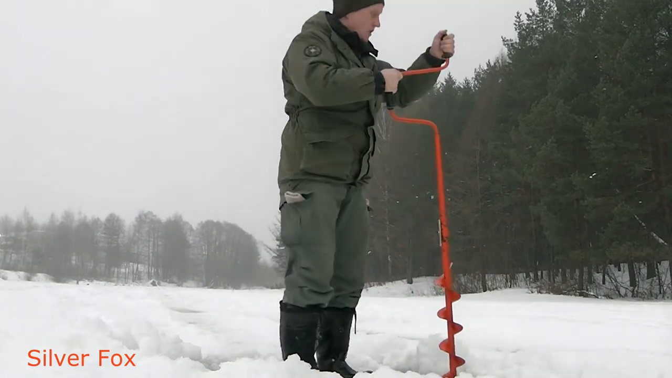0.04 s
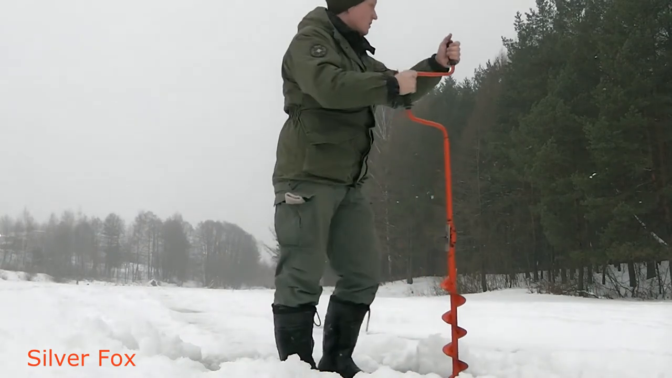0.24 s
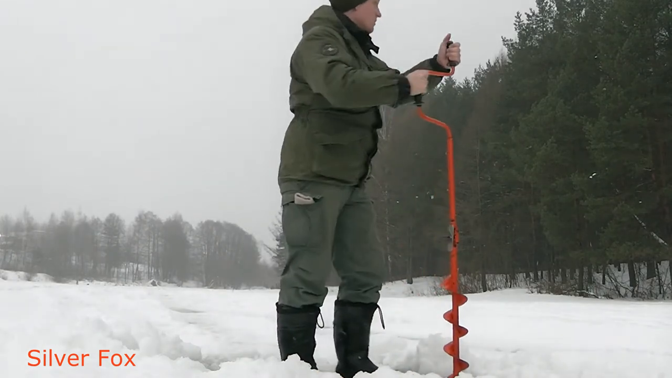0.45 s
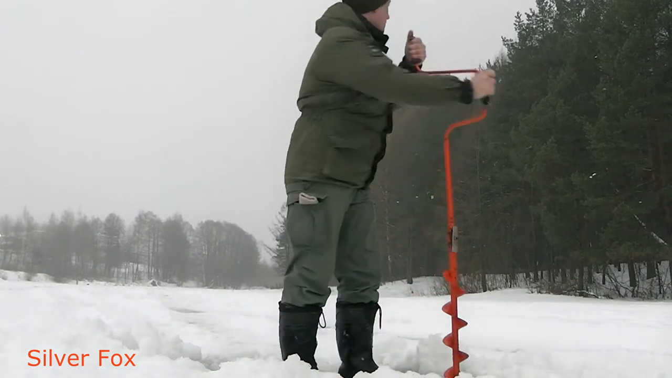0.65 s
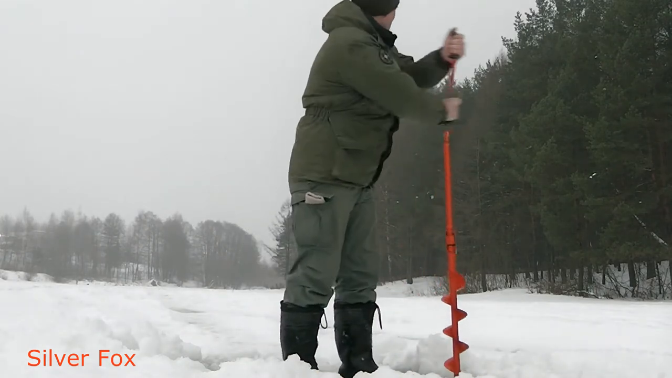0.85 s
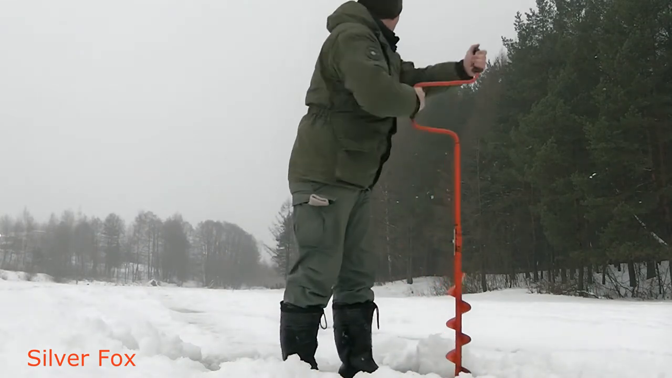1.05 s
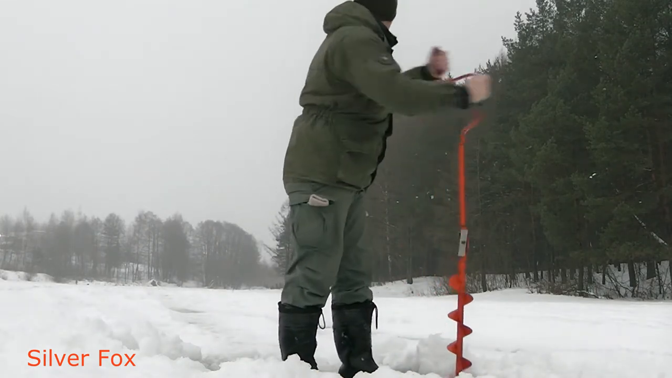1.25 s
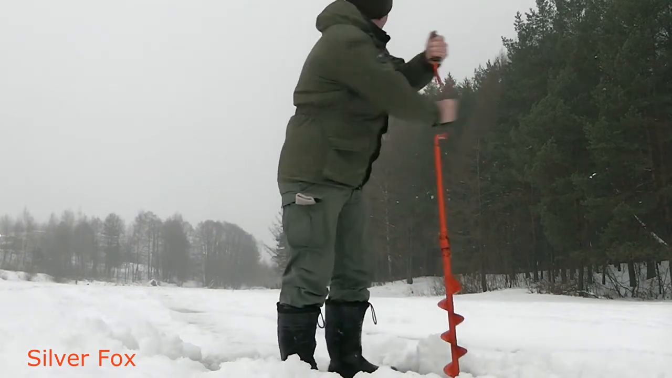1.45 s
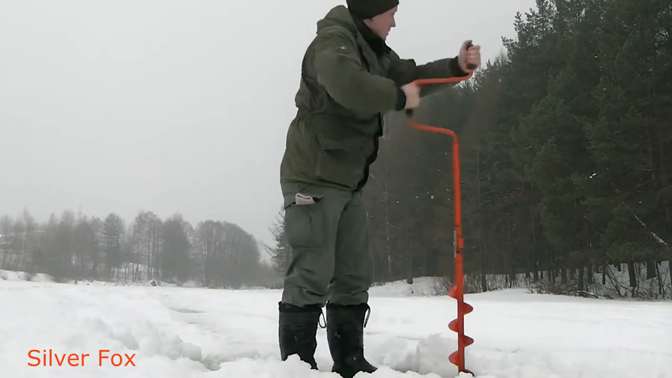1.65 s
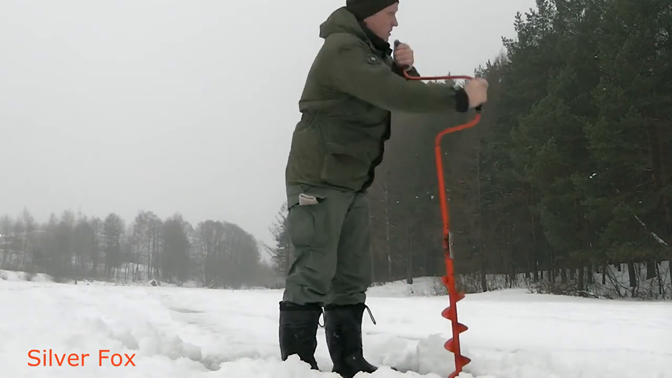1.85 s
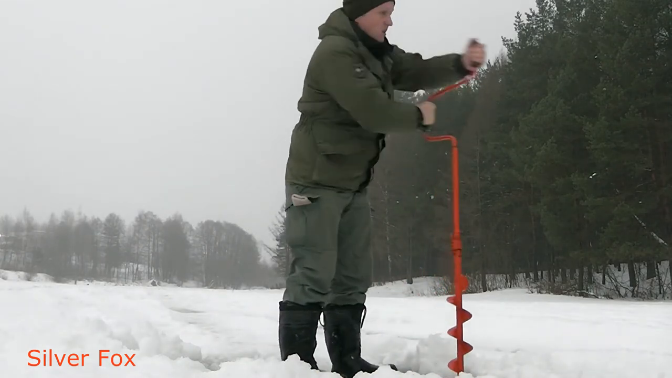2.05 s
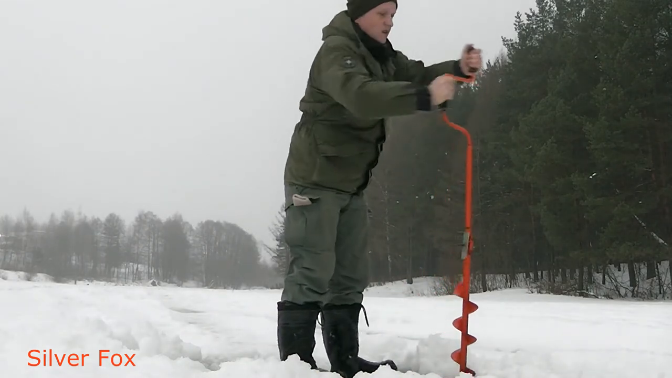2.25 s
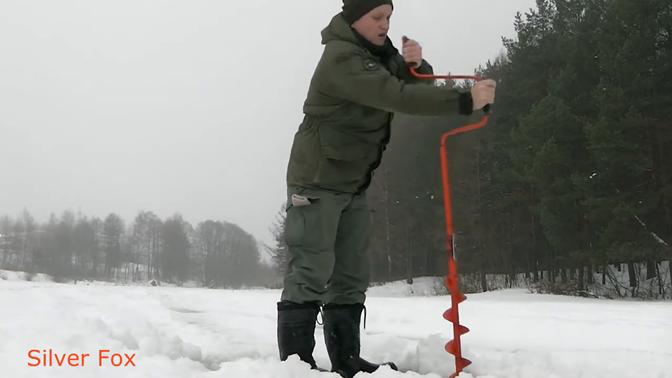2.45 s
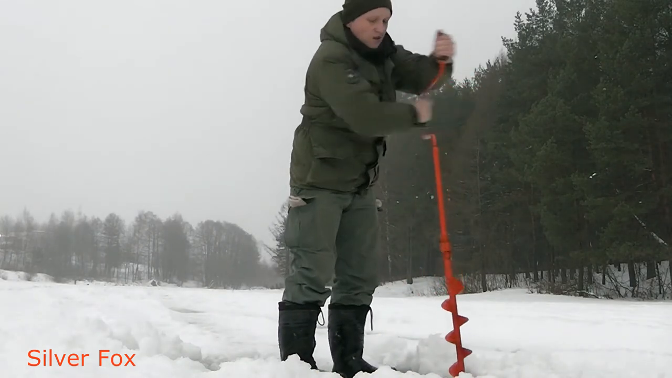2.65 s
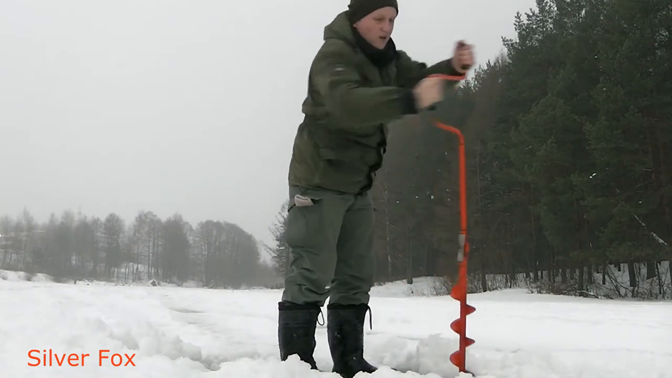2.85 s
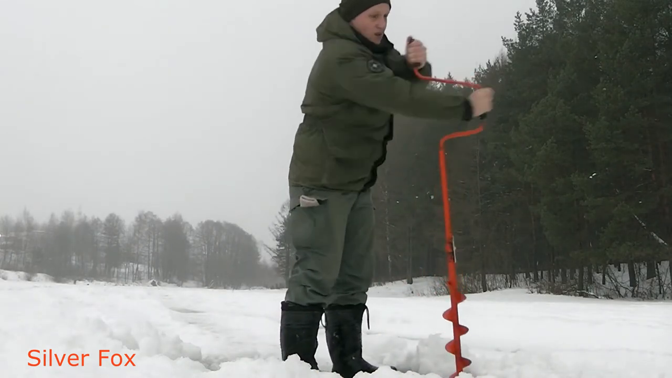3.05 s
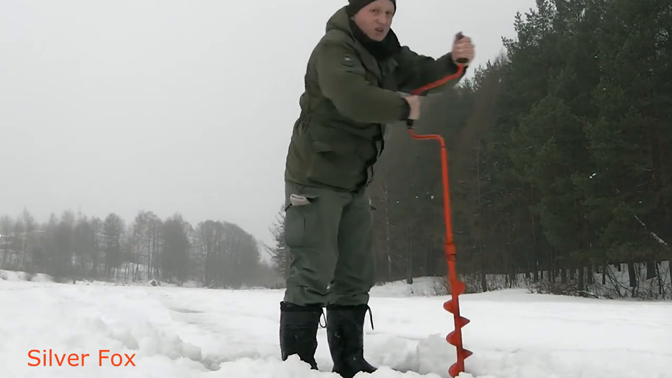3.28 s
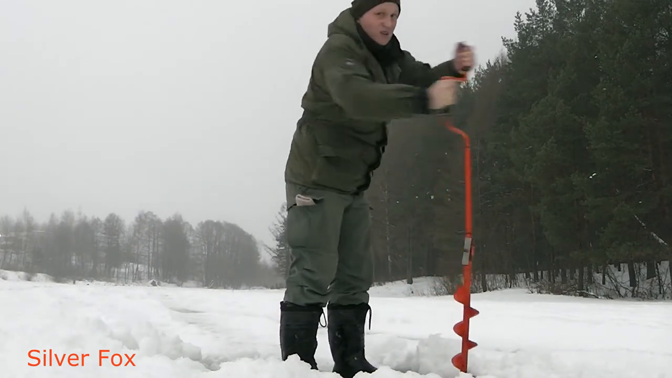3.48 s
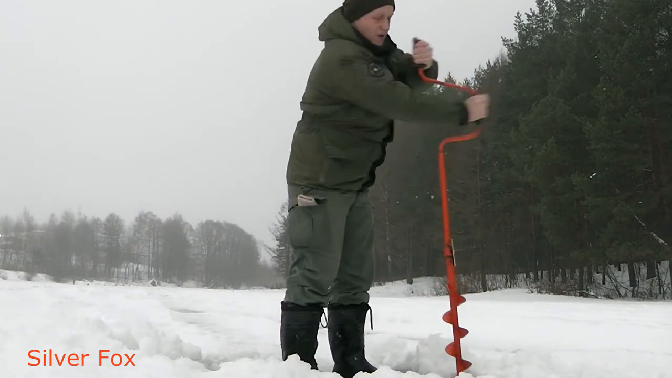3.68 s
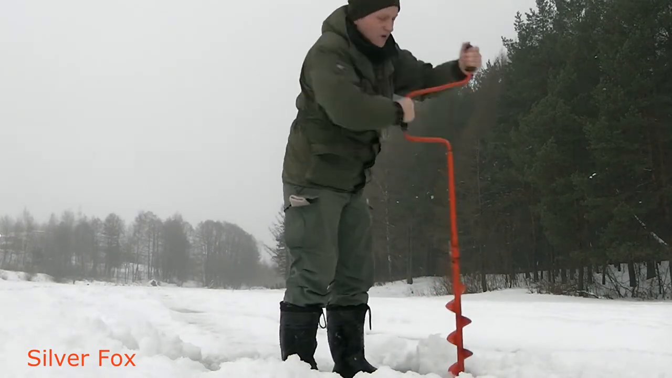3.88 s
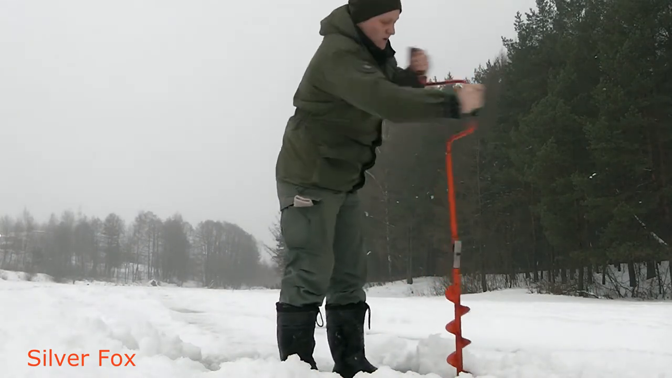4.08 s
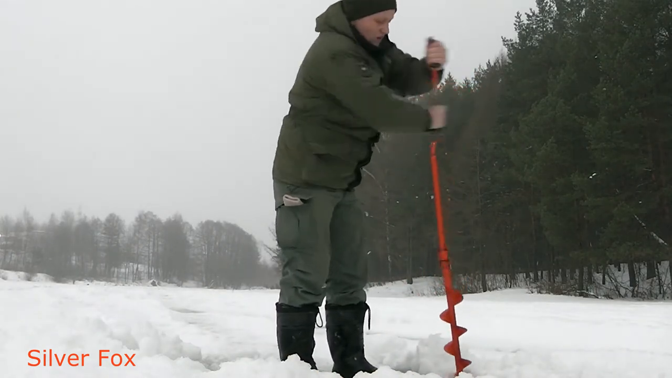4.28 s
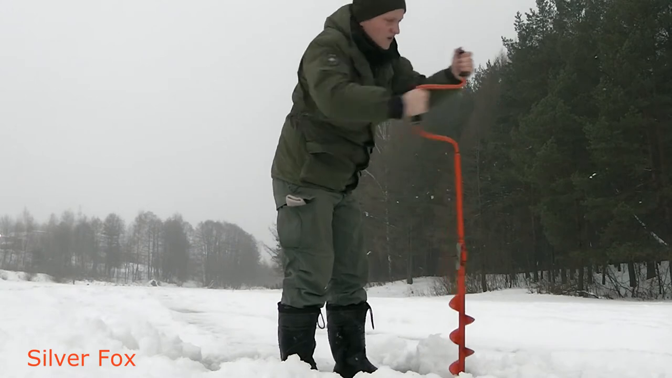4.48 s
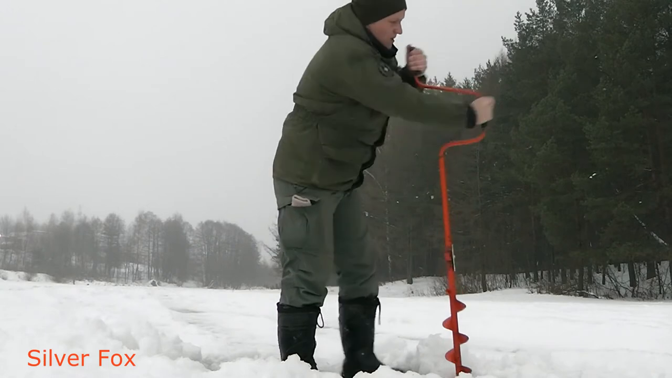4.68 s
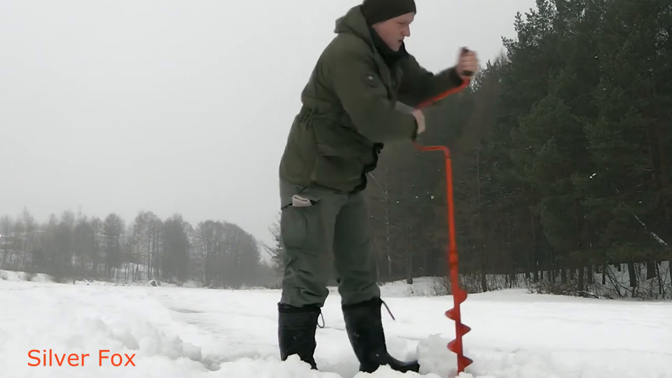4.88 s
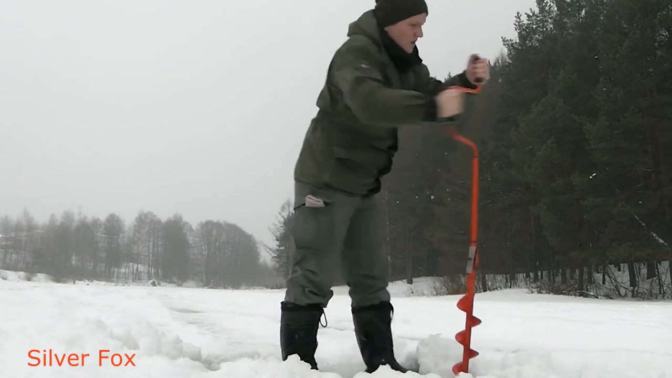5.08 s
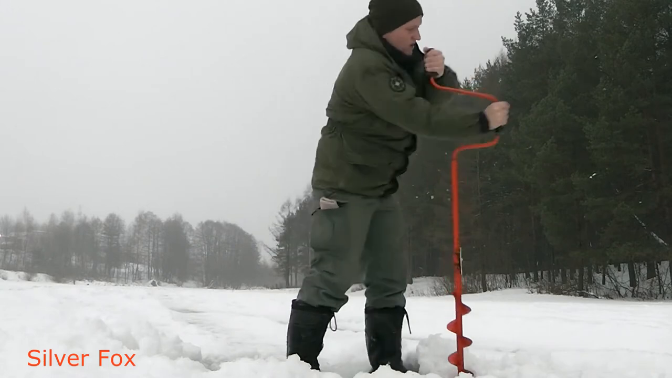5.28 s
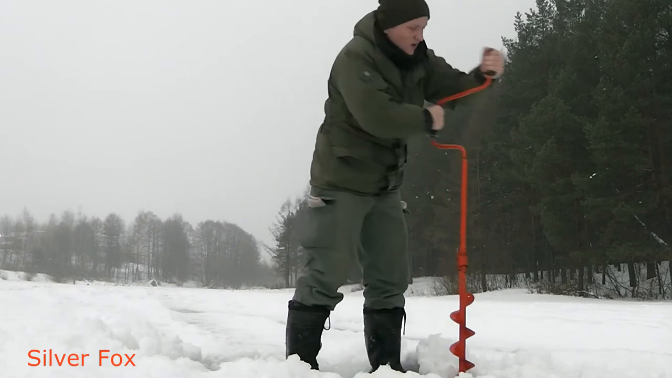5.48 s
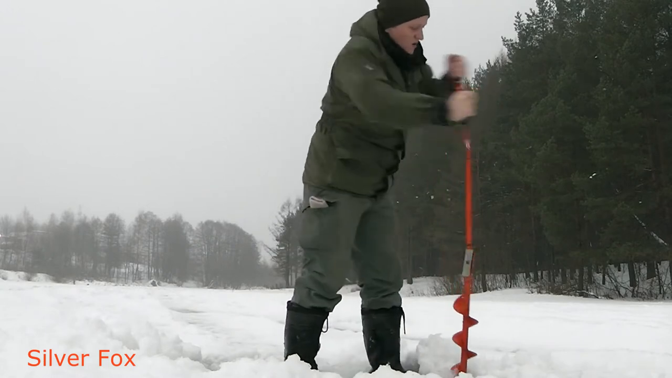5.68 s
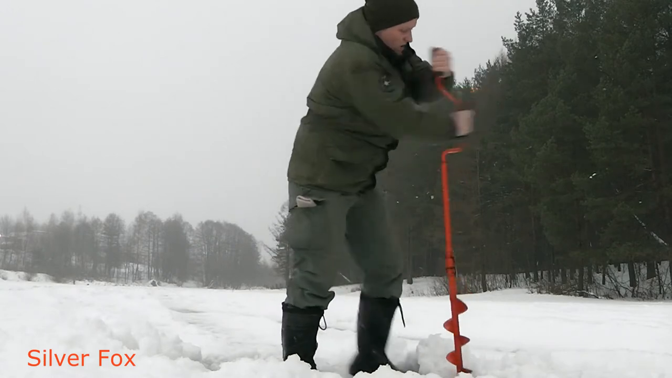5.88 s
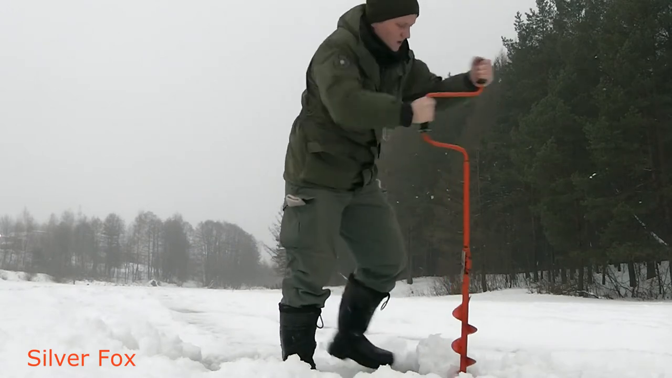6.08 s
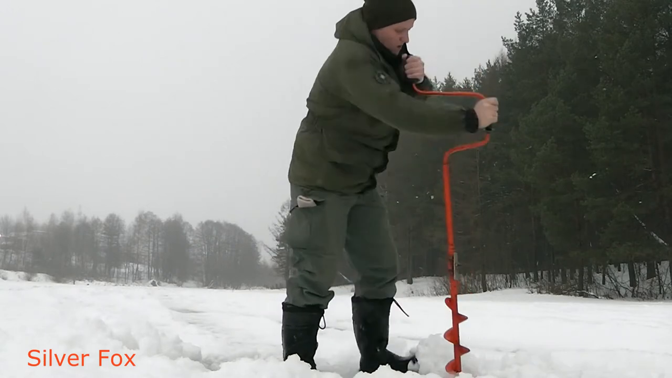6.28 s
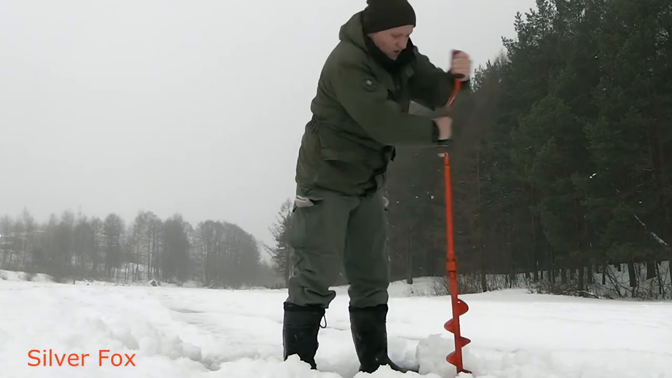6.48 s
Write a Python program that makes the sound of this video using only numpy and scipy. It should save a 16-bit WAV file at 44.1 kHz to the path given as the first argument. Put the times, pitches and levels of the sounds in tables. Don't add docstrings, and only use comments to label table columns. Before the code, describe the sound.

Outdoors in light low wind, a few crisp snow crunches lead into a hand auger biting ice. Rapid uneven hollow knocks grow loud, ringing in the drilled hole, then fall in pitch as it deepens. Ice shavings hiss and scrape along the spiral, the steel shaft squeaks briefly, and sharp cracks punctuate the later part. Dry and close, from a few metres, with no echo.

```python
import sys
import numpy as np
from scipy import signal
from scipy.io import wavfile
from scipy.ndimage import uniform_filter1d

SR = 44100
rng = np.random.default_rng(int(sys.argv[2]) if len(sys.argv) > 2 else 0)


def rack_gain(trim_db):
    fader = np.asarray(trim_db, float)
    return 10 ** (fader / 20)


def inscribe(sig):
    pcm = np.round(np.clip(np.atleast_2d(sig).T, -1, 1) * 32767)
    wavfile.write(sys.argv[1], SR, pcm.astype(np.int16))


N = 287973


def evened(x):
    return x / np.sqrt(np.mean(x ** 2) + 1e-20)


def read(points, hz):
    f, value = np.transpose(points)
    return np.interp(np.log(hz + 1), np.log(f + 1), value)


def columns(rows):
    s, *values = np.transpose(rows)
    return [np.interp(np.arange(N) / SR, s, v) for v in values]


def lowpassed(x, order, hz):
    return signal.sosfilt(signal.butter(order, hz, fs=SR, output="sos"), x)


def coloured(x, points):
    half = np.log(rack_gain(np.maximum(read(points, np.fft.rfftfreq(4096, 1 / SR)), -100)))
    full = np.r_[half, half[-2:0:-1]]
    phase = -signal.hilbert(full).imag
    taps = np.fft.ifft(np.exp(full + 1j * phase)).real[:2048]
    return signal.oaconvolve(x, taps / np.linalg.norm(taps))[:len(x)]


def resonate(x, hz, width, order=1):
    turn = np.exp(2j * np.pi * np.cumsum(hz * np.ones(N)) / SR)
    r = np.exp(-np.pi * width / SR)
    low = x / turn
    for _ in range(order):
        low = signal.lfilter([1 - r], [1, -r], low)
    return evened((turn * low).real)


def steadied(x, share, seconds):
    power = uniform_filter1d(x ** 2, max(int(seconds * SR), 8))
    return evened(x / (power + 0.021) ** (share / 2))


def wander(rate_hz):
    return evened(lowpassed(rng.standard_normal(N), 2, rate_hz))


def blotches(shape, tall, wide):
    field = uniform_filter1d(rng.standard_normal(shape), size=tall, axis=0)
    return evened(uniform_filter1d(field, size=wide, axis=1))


def bumps(s, length):
    away = 2 * (np.arange(0, N, 64) / SR - np.c_[s]) / np.c_[length]
    return np.exp(-np.minimum(away ** 2, 50))


def lifted(db, s, length, lift_db):
    return db + np.interp(np.arange(N), np.arange(0, N, 64), lift_db @ bumps(s, length))


def peaked(db, s, length, peak_db):
    return 10 * np.log10(lifted(rack_gain(2 * db), s, length / np.sqrt(2), rack_gain(2 * peak_db)))


def chips(per_s, spread_db, smooth):
    size = rack_gain(spread_db * np.minimum(rng.exponential(1, N), 5)) * rng.choice([-1., 1.], N)
    broken = evened(size * (rng.random(N) < per_s / SR))
    smooth = np.clip(smooth, 0, 1)
    return np.sqrt(smooth) * rng.standard_normal(N) + np.sqrt(1 - smooth) * broken


# (time [s], level [dB])
WIND_LEVEL = [(0.0, -41), (0.35, -37.5), (0.95, -37.5), (1.85, -38.5), (2.78, -41.5), (3.97, -39),
              (4.7, -40.5), (5.2, -36.5), (6.53, -38.5)]
# (time [s], length [s], lift [dB])
WIND_GUSTS = [
    (1.087, 0.074, -3),
    (4.37, 0.16, -3),
    (4.437, 0.095, 5.5),
    (4.88, 0.11, 4),
    (5.397, 0.16, -4),
    (5.53, 0.045, 6),
    (5.996, 0.1, 5),
    (6.113, 0.091, -5),
    (6.26, 0.086, 1.5),
    (6.34, 0.06, -4),
]
# (frequency [Hz], level [dB per Hz])
AIR_SPECTRUM = [(13, -55), (22, -4), (65, -7), (147, -8.5), (194, -13.5), (228, -17.5), (301, -20),
                (724, -25.5), (1040, -26), (2050, -34.5), (2400, -55), (3380, -54), (5720, -74)]


def wind():
    level_db = lifted(columns(WIND_LEVEL)[0], *np.transpose(WIND_GUSTS))
    cut = signal.butter(2, 36, "high", fs=SR, output="sos")

    def wash():
        air = coloured(rng.standard_normal(N), AIR_SPECTRUM)
        return steadied(signal.sosfilt(cut, air), 0.32, 0.062)

    shared, own = wash(), wash()
    buffet = 1.7 * evened(lowpassed(own, 6, 36))
    moan_hz = 95 * (1 + .2 * wander(1.5))
    moan = .35 * resonate(rng.standard_normal(N), moan_hz, 14, order=2)
    unlike = rack_gain(-27.5) * np.outer([1, -1], own + buffet)
    return rack_gain(level_db - 1.7) * (shared + moan + unlike)


# (time [s], level [dB])
SHAVING_FLOW = [(0.0, -55.5), (0.17, -59.5), (0.32, -56), (0.44, -67), (0.48, -54), (0.67, -44.5),
                (1.18, -44.5), (1.33, -37), (2.2, -41), (2.8, -37), (3.44, -38.5), (3.7, -35), (4.4, -35.5),
                (5.0, -39.5), (5.35, -36), (5.62, -39), (6.18, -38), (6.53, -37)]
# (time [s], length [s], lift [dB])
FLOW_SPURTS = [(0.043, 0.09, 1.5), (0.203, 0.035, 10), (0.271, 0.065, 11.5), (.465, 0.0072, -1),
               (0.499, 0.012, -11), (1.13, .13, -4), (1.741, 0.021, 4), (1.806, 0.071, -6),
               (1.933, 0.12, 2.5), (1.996, .04, -4), (2.066, 0.079, 5), (3.125, 0.1, 2), (3.634, 0.1, 2),
               (4.465, 0.061, -1), (4.575, 0.045, -3.5), (4.671, 0.057, 6), (4.748, 0.018, 5),
               (4.834, 0.18, 3), (5.223, 0.091, 5), (5.817, 0.014, 7), (5.834, 0.01, 4), (5.868, 0.027, 5),
               (5.95, 0.15, 2.5), (6.295, 0.079, 5.5), (6.427, 0.026, 3.5)]
# (time [s], length [s], lift [dB])
DUST_PUFFS = [
    (4.825, .022, 10),
    (4.862, .004, 14),
    (5.32, .03, 2),
    (6.217, 0.083, 10),
]
# (time [s], length [s], frequency [Hz], lift [dB])
SLIDING_CLOTS = [(.27, .04, 9100, 6), (0.485, .01, 4300, 18), (1.42, 0.074, 6300, 3.5),
                 (1.532, 0.029, 4180, 1), (1.887, 0.19, 8700, 5), (1.94, 0.071, 6060, 7),
                 (2.083, 0.084, 8600, 4), (2.566, 0.099, 5900, 7.5), (2.954, 0.19, 8500, 6),
                 (3.13, 0.11, 5570, 5.5), (3.3, 0.071, 8440, 7), (3.604, 0.087, 8530, 2),
                 (3.77, 0.05, 5330, 6.5), (4.15, .1, 8600, 2.5), (4.39, 0.054, 7400, 8),
                 (6.206, 0.028, 9500, 9), (0.378, .012, 5000, 22), (5.73, 0.078, 9800, 5.5),
                 (6.048, 0.063, 9550, 3)]
# (time [s], length [s], frequency [Hz], lift [dB])
FLUTE_STREAKS = [
    (1.71, 0.14, 7600, 9),
    (2.2, .06, 5000, 17),
    (2.5, 0.42, 11000, 12),
    (3.21, 0.54, 7600, 2.5),
    (3.15, .1, 6800, 3),
    (2.47, 0.1, 7000, -5),
    (3.9, 0.87, 7200, -0.5),
    (4.9, .06, 8500, 7),
    (4.7, .06, 5500, 6),
    (2.2, .05, 4200, 6),
]
# (frequency [Hz], level [dB per Hz])
SPRAY_SPECTRUM = [(1410, -32), (2400, -15), (2540, -13), (3130, -11), (3330, -16), (3660, -9), (5420, -2),
                  (6690, -2), (7470, 0), (10400, -6.5), (11700, -22), (14800, -19.5), (15600, -43)]
# (frequency [Hz], level [dB per Hz])
SCRAPE_SPECTRUM = [(100, -63), (180, -11), (300, 0.5), (600, 1), (1000, 1.5), (1400, 0.5), (2000, -0.5),
                   (2500, -16.5), (3200, -31), (6000, -72)]
# (frequency [Hz], level [dB per Hz])
DUST_SPECTRUM = [(6000, -33), (10000, -4.5), (12000, -4), (15600, -12), (17000, -42)]
# (time [s], length [s], shaft ring peak [dB], overtone peak [dB])
WALL_BINDS = [(0.993, 0.07, -58, -35), (1.757, 0.048, -49, -35), (2.236, 0.11, -57, -34),
              (1.355, 0.065, -38, -46), (1.61, 0.12, -42, -31), (2.97, 0.13, -38, -35.5),
              (3.592, 0.16, -30, -30), (3.834, 0.087, -31, -24.5), (4.1, 0.074, -38, -40),
              (4.389, 0.13, -32.5, -18), (4.763, 0.091, -39, -26.5), (4.928, 0.18, -35.5, -38),
              (5.224, 0.094, -30.5, -23.5), (5.503, 0.3, -31.5, -30), (5.785, 0.22, -30, -25),
              (5.966, 0.12, -35.5, -30), (6.303, 0.18, -33.5, -27)]


def shavings():
    spray_db = lifted(columns(SHAVING_FLOW)[0], *np.transpose(FLOW_SPURTS))
    scrape_db = -41.5 + 0.8 * (spray_db + 37)
    s, length, ring_db, _ = np.transpose(WALL_BINDS)
    scrape_db = peaked(scrape_db, s, length, ring_db - 10.5)
    clumps = wander(68)
    spray = coloured(chips(7000, 7.9, 0.82), SPRAY_SPECTRUM) * rack_gain(1.3 * clumps)
    scrape = coloured(chips(2500, 3.9, 0.55), SCRAPE_SPECTRUM) * rack_gain(0.26 * clumps)

    hz, t, z = signal.stft(np.array([spray, scrape]), SR, nperseg=512)
    field_db = 1.4 * blotches(z[0].shape, tall=8, wide=8)
    field_db += 3.1 * blotches(z[0].shape, tall=2, wide=6)
    for rows, log_width in (SLIDING_CLOTS, 0.14), (FLUTE_STREAKS, 0.019):
        for s, length, ring_hz, lift_db in rows:
            off_time = 2 * (t - s) / length
            off_pitch = np.log(hz[:, None] / ring_hz + 1e-9) / log_width
            field_db += lift_db * np.exp(-off_time ** 2 - off_pitch ** 2)
    patchy = signal.istft(z * rack_gain(field_db), SR, nperseg=512)[1][:, :N]
    spray, scrape = map(evened, patchy)

    grains = chips(5700, 4.5, 0.5) * rack_gain(1.8 * clumps)
    dust_db = lifted(0.6 * spray_db - 26.5, *np.transpose(DUST_PUFFS))
    dust = rack_gain(dust_db) * coloured(grains, DUST_SPECTRUM)
    return rack_gain(spray_db - 0.2) * spray + rack_gain(scrape_db + 3.5) * scrape + dust


# (time [s], peak [dB], decay by 60 dB [s], weight of the low thud [dB])
CRUNCHES = [(0.0594, -40, 0.044, -4), (0.1982, -30.5, 0.14, -8), (0.214, -37, 0.033, -15),
            (0.288, -31.5, 0.048, -6), (0.133, -36, 0.023, 10), (0.379, -38, 0.02, -10),
            (0.474, -33, 0.026, -13), (0.4894, -51, 0.023, -17), (0.6853, -49, 0.031, -20),
            (1.328, -37, 0.046, -6), (3.403, -33, 0.036, -18), (3.6392, -20.5, 0.062, 14),
            (4.6706, -11, 0.018, -15), (4.6817, -19, 0.024, -15), (4.8211, -14.5, 0.034, -28),
            (4.8268, -13, 0.02, -10), (4.7955, -25, .02, -20), (4.861, -21, 0.025, -13),
            (4.905, -19, 0.043, -15), (5.221, -26, 0.075, -10), (5.3207, -31, 0.058, -8),
            (5.7124, -22, 0.059, -11), (5.7774, -16, 0.04, 2), (5.7832, -16, .03, -10),
            (5.8134, -19, 0.04, -17), (5.818, -17, .03, -17), (5.828, -6.5, 0.015, -12),
            (5.8635, -18, 0.05, -27), (5.8695, -19, 0.03, -22), (5.877, -17, .02, -20),
            (5.8905, -19, 0.047, -6), (6.196, -28, 0.04, 19), (6.321, -17, 0.031, -8),
            (6.384, -21, 0.067, -4), (6.3987, -18, 0.044, -12), (6.423, -21.5, 0.036, -14),
            (6.4583, -21.5, 0.047, 0)]
# (frequency [Hz], level [dB per Hz])
CRACK_SPECTRUM = [(1350, 5), (2300, 3), (2740, -6.5), (3720, 2), (4960, 2), (6360, 4), (6940, 1),
                  (12800, -8), (15600, -17)]


def snaps():
    layers = np.zeros((2, N + SR))
    t = np.arange(SR // 8) / SR
    crumbs = rng.standard_normal((len(CRUNCHES), len(t)))
    onset = np.minimum(t / 0.00043, 1) * (1 + 1.0 * np.exp(-t / 0.00018))
    for (s, peak_db, t60, thud_db), noise in zip(CRUNCHES, crumbs):
        burst = rack_gain(peak_db - 60 * t / max(t60, .005)) * noise * onset
        layers[:, round(s * SR):][:, :len(t)] += burst * rack_gain([[-6], [thud_db - 41]])
    return coloured(layers[0, :N], CRACK_SPECTRUM) + coloured(layers[1, :N], SCRAPE_SPECTRUM)


# (frequency [Hz], level [dB per Hz])
SHEET_SPECTRUM = [(150, -15), (330, 0), (500, 5), (680, -1.5), (760, -23.5), (1000, -19), (2000, -66),
                  (4000, -100)]


def sheet(drive, note_hz):
    hz, t, z = signal.stft(coloured(drive, SHEET_SPECTRUM), SR, nperseg=2048, noverlap=1536)
    floor_hz = 1.085 * np.interp(t * SR, np.arange(N), note_hz)
    octaves_below = np.log2(floor_hz / (hz[:, None] + 1))
    ridges_db = 3.5 * blotches(z.shape, tall=2, wide=6)
    shaped = z * rack_gain(ridges_db - 38 * np.clip(octaves_below, 0, .4))
    hum = signal.istft(shaped, SR, nperseg=2048, noverlap=1536)[1][:N]
    boom_db = -17 - 7 * np.clip((3.35 - np.arange(N) / SR) / .2, 0, 1)
    return hum * 0.99 + rack_gain(boom_db) * resonate(drive, 342, 88, order=2)


# (frequency [Hz], width [Hz], level at the start [dB], gain at full depth [dB])
SHAFT_MODES = [
    (1115, 36, -1.5, 24),
    (1158, 77, 12.5, -7),
    (1232, 70, 11.5, -36),
]


def shaft_ring(drive, depth):
    modes = [rack_gain(db + gain_db * depth) * resonate(drive, hz, width, order=2)
             for hz, width, db, gain_db in SHAFT_MODES]
    return steadied(sum(modes), 0.12, 0.016)


def air_column(drive, note_hz, depth):
    shallow = resonate(drive, note_hz, 180.0, order=3)
    deep = resonate(drive, note_hz, 38.0, order=3)
    pure = np.clip(2.2 * depth, 0, 0.5)
    core = steadied((1 - pure) * shallow + pure * deep, 0.95, 0.016)
    slush_db = 4.5 * depth ** 2 * np.clip(wander(7), -2.5, 1) - 1.5 * depth
    return core * rack_gain(slush_db)


def catches(rows, rise_s):
    sound, outline = np.zeros((2, N + SR))
    t = np.arange(SR // 20) / SR
    shape = (t / rise_s / 2 * np.exp(1 - t / rise_s / 2)) ** 3
    for (s, peak_db, hz), turn in zip(rows, rng.random(len(rows))):
        start = round((s - 0.00398) * SR)
        sound[start:][:len(t)] += rack_gain(peak_db - 1.5) * shape * np.sin(2 * np.pi * (hz * t + turn))
        outline[start:][:len(t)] += rack_gain(peak_db) * shape
    return sound[:N], outline[:N]


# (time [s], level [dB])
BLADE_PRESSURE = [(0.7, -49), (0.85, -44.5), (2.2, -40.5), (2.88, -33), (3.3, -20), (4.5, -28),
                  (5.0, -25.5), (5.58, -30), (6.3, -27.5), (6.53, -21)]
# (time [s], length [s], peak [dB], note [Hz])
BLADE_BITES = [(1.074, 0.1, -24, 645), (1.22, 0.073, -36.5, 634), (1.334, .06, -46, 664),
               (1.411, 0.063, -23, 665), (1.645, 0.17, -24.5, 630), (1.75, 0.044, -40, 687),
               (1.899, 0.048, -21, 660), (1.95, 0.047, -27, 700), (2.06, 0.058, -24.5, 640),
               (2.216, 0.042, -51, 705), (2.318, 0.14, -29.5, 667), (2.44, 0.15, -29.5, 625),
               (2.53, 0.06, -20, 675), (2.57, 0.071, -17.5, 614), (2.643, 0.056, -27, 683),
               (2.704, 0.071, -29, 588), (2.758, 0.13, -18, 616), (2.908, 0.046, -32, 704),
               (2.98, 0.13, -18.5, 670), (3.043, 0.11, -15, 623), (3.15, 0.23, -15, 579),
               (3.25, 0.059, -18.5, 614), (3.415, 0.17, -21, 650), (3.48, .06, -36, 598),
               (3.63, 0.18, -13, 550), (3.734, 0.081, -28, 455), (3.796, 0.045, -19, 513),
               (3.862, 0.06, -13.5, 445), (3.927, .05, -30, 431), (4.001, 0.089, -20.5, 531),
               (4.07, .05, -21, 568), (4.117, .04, -14.5, 481), (4.19, 0.2, -15, 536),
               (4.292, 0.15, -24, 458.6), (4.388, 0.055, -14, 412), (4.443, 0.028, -21, 353),
               (4.573, 0.041, -18.5, 435), (4.684, 0.095, -20.5, 405), (4.802, 0.085, -19, 368),
               (4.916, 0.12, -19, 365), (5.071, 0.095, -19.5, 410.5), (5.239, 0.11, -18, 382),
               (5.388, 0.3, -27.5, 371), (5.755, 0.13, -20, 360.3), (5.898, 0.077, -19, 342.4),
               (6.03, 0.064, -29, 415), (6.061, 0.11, -20.5, 310), (6.267, 0.16, -29.5, 363),
               (6.446, 0.064, -28, 385), (6.514, 0.065, -26, 434)]
# (level at a bite of -30 dB [dB], share of the bite followed, gain at full depth [dB])
BITE_FOLLOWERS = [
    (-46, 0.056, 14.5),
    (-45.5, 0.19, 3),
    (-31.2, 0.48, 5),
]
# (time [s], peak [dB], note [Hz])
HARD_CATCHES = [(0.971, -28, 735), (1.011, -24, 614), (1.037, -23, 650), (1.057, -25, 675),
                (1.075, -19.5, 640), (1.139, -26, 606), (1.351, -26, 650), (1.38, -21.5, 751),
                (1.405, -14, 628), (1.513, -20.5, 633), (1.58, -21, 625), (1.599, -17.5, 660),
                (1.653, -24, 684), (1.679, -11, 654), (1.732, -26, 727), (1.826, -25, 666),
                (1.857, -23.5, 616), (1.878, -17, 630), (1.901, -15, 660), (2.005, -21, 630),
                (2.051, -14, 640), (2.097, -24, 620), (2.206, -33, 780), (2.309, -25, 690),
                (2.338, -21, 725), (2.394, -28, 716), (2.432, -31, 593), (2.463, -22.5, 600),
                (2.507, -21, 630), (2.531, -14.5, 670), (2.568, -10, 642), (2.636, -17, 689),
                (2.7, -18, 555), (2.741, -5.5, 619), (2.793, -10.5, 624), (2.911, -18, 743),
                (2.945, -9.5, 680), (2.994, -8, 622), (3.014, -6, 647), (3.035, -3.5, 636),
                (3.064, -10, 590), (3.086, -9, 610), (3.139, -6, 564), (3.248, -8, 616), (3.312, -9, 657),
                (3.359, -19, 653), (3.382, -14, 594), (3.404, -9.5, 656), (3.448, -12, 617),
                (3.482, -13, 597), (3.524, -12.5, 612), (3.533, -8, 562),
                (1.1, -16.5, 630),
    (3.158, -6, 578),
    (3.205, -9, 580),
    (3.609, -3.5, 575),
    (3.625, -3.5, 555),
    (3.704, -8.5, 493),
    (3.866, -7, 447),
    (3.883, -8, 430),
    (4.432, -12.5, 380),
    (5.735, -9, 345),
]
# (time [s], peak [dB], note [Hz])
DEEP_CATCHES = [(3.59, -3, 592), (3.651, -6.5, 531), (3.685, -9.5, 500), (3.787, -11, 518),
                (3.808, -8.5, 523), (3.849, -7.5, 457), (3.911, -18, 442), (3.943, -13.5, 475),
                (3.97, -10, 516), (3.992, -12.5, 532), (4.034, -11.5, 498), (4.056, -14, 590),
                (4.079, -17, 578), (4.11, -8, 444), (4.224, -11.5, 497), (4.254, -9, 437),
                (4.341, -16, 434), (4.369, -6, 417), (4.526, -14.5, 391), (4.621, -14, 454),
                (4.644, -13, 426), (4.667, -9.5, 423), (4.691, -13.5, 421), (4.756, -15.5, 382),
                (4.782, -9.5, 377), (4.883, -11.5, 418), (4.904, -8.5, 363), (4.936, -13.5, 388),
                (4.986, -18, 460), (5.071, -18, 425), (5.133, -18, 442), (5.2, -9.5, 375), (5.25, -8, 355),
                (5.302, -13.5, 383), (5.335, -17, 365), (5.405, -13.5, 374), (5.483, -20, 525),
                (5.509, -12.5, 368), (5.612, -16, 355), (5.689, -22, 382), (5.709, -14, 342),
                (5.827, -19, 492), (5.886, -13, 364), (5.964, -19, 437), (6.001, -16, 402),
                (6.15, -14.5, 350), (6.225, -15.5, 357), (6.281, -23, 499), (6.305, -14.5, 464),
                (6.36, -12.5, 347), (6.416, -13.5, 384), (6.458, -11.5, 355)]


def hole():
    s, length, peak_db, hz = np.transpose(BLADE_BITES)
    bite_db = peaked(columns(BLADE_PRESSURE)[0], s, length, peak_db)
    note_hz = columns(np.c_[s, hz])[0] * (1 + 0.014 * wander(17.8))
    depth = np.clip(np.arange(N) / SR / 8.6 - .2, 0, 1)
    overtone_db, shaft_db, sheet_db = (db + share * (bite_db + 30) + gain_db * depth
                                       for db, share, gain_db in BITE_FOLLOWERS)
    s, length, ring_db, howl_db = np.transpose(WALL_BINDS)
    overtone_db = peaked(overtone_db, s, length, howl_db)
    shaft_db = peaked(shaft_db, s, length, ring_db)

    drive = chips(900, 1.77, 0.38) * rack_gain(1.1 * wander(49))
    core = air_column(drive, note_hz, depth)
    overtone_hz = (740 + 90 * depth) * (1 + 0.034 * wander(2.7))
    ringing = rack_gain(overtone_db - 2.5) * resonate(drive, overtone_hz, 149, order=3)
    ringing += rack_gain(shaft_db - 1.0) * shaft_ring(drive, depth)
    ringing += rack_gain(sheet_db) * sheet(drive, note_hz)

    shallow_catches = catches(HARD_CATCHES, 0.004)
    caught, outline = np.add(shallow_catches, catches(DEEP_CATCHES, 0.0049))
    around = uniform_filter1d(outline, size=700, origin=-150)
    hush = 1 + 3.3 * around / rack_gain(bite_db + 5)
    start = np.clip((np.arange(N) / SR - BLADE_PRESSURE[0][0]) / 0.11, 0, 1)
    note = start * rack_gain(bite_db + 0.24) * core / hush + caught
    return start * ringing + lowpassed(note, 6, 760)


# (time [s], length [s], frequency [Hz], peak [dB])
SUNG_SQUAWKS = [(3.877, 0.06, 1137, -28), (3.865, .04, 885, -27), (3.812, .025, 900, -28),
                (5.618, .035, 785, -27), (6.135, .045, 752, -28), (6.01, .04, 825, -30),
                (4.37, .04, 1133, -26), (4.451, 0.021, 1136, -23.5), (5.185, 0.06, 1135, -31),
                (4.445, .04, 790, -23), (5.99, .08, 205, -33), (5.783, 0.021, 1115, -16.5),
                (5.83, 0.042, 1153, -24), (5.465, .05, 1142, -31), (5.716, 0.049, 1127, -30),
                (1.297, .12, 1255, -43), (1.522, .07, 1247, -41), (5.923, .04, 1140, -34),
                (6.3, 0.038, 1122, -17), (6.378, 0.034, 1156, -33)]


def squawks():
    t = np.arange(N) / SR
    return sum(rack_gain(db) * np.exp(-(2 * (t - s) / length) ** 2) * np.sin(2 * np.pi * hz * t)
               for s, length, hz, db in SUNG_SQUAWKS)


# (frequency [Hz], likeness [0-1], left over right [dB], left lead [rad])
MICROPHONE_PORTS = [(100, .998, -.3, 0), (350, .999, -.8, 0), (1000, .998, -.1, 0), (2800, .99, 0, 0),
                    (4200, .993, -.2, 0), (4900, .975, -1.5, 0), (5500, .998, -.2, 0),
                    (8500, .997, -.4, -.1), (9600, .95, -3.4, -.4), (10700, .88, -7.5, -.3),
                    (11400, .72, -9.8, .45), (12300, .86, -5, 1.45), (13200, .86, 0, 1.0),
                    (14600, .86, 1.5, .5), (15500, .98, .4, .1)]


def ports(x):
    hz, t, z = signal.stft(x, SR, nperseg=512)
    other = abs(z) * np.exp(2j * np.pi * rng.random(z.shape)) * 1.3
    f, *traits = np.transpose(MICROPHONE_PORTS)
    same, lean_db, lead = (read(np.c_[f, v], hz)[:, None] for v in traits)
    shared = np.sqrt((1 + same) / 2) * z
    own = np.sqrt((1 - same) / 2) * other
    tilt = rack_gain(lean_db / 2) * np.exp(.5j * lead)
    both = np.array([(shared + own) * tilt, (shared - own) / tilt])
    return signal.istft(both, SR, nperseg=512)[1][:, :N]


def scene():
    return wind() + ports(shavings() + snaps() + hole() + squawks())


def roll_off(x):
    return signal.sosfilt(signal.butter(12, 15770, fs=SR, output="sos"), x)


def record(dry):
    ceiling = 1.1
    return roll_off(ceiling * np.tanh(dry / ceiling))


dry = scene()
out = record(dry)
inscribe(out)
```